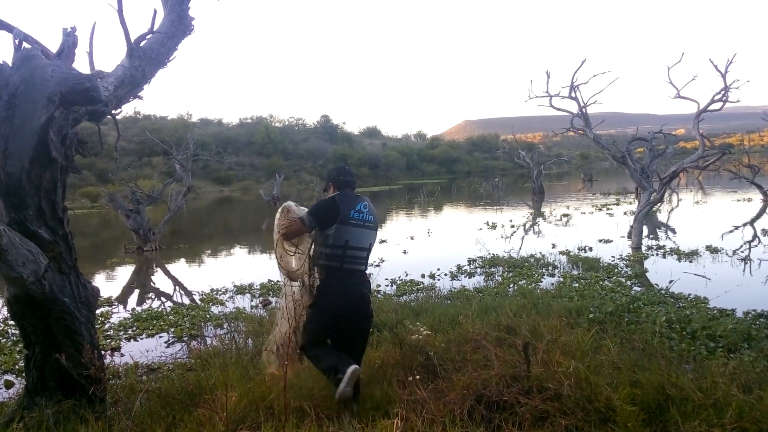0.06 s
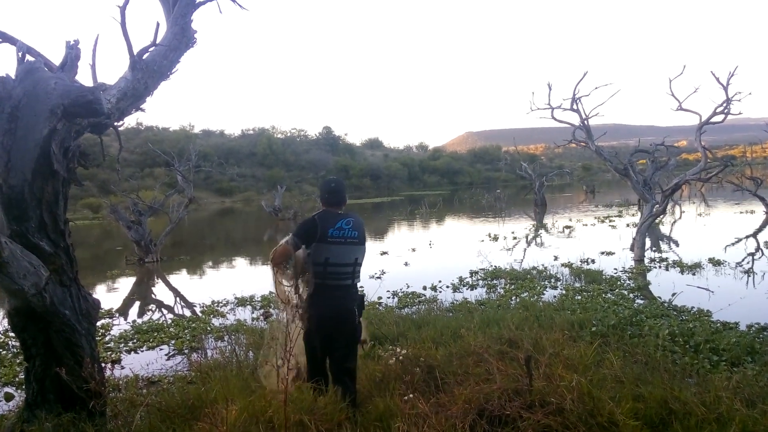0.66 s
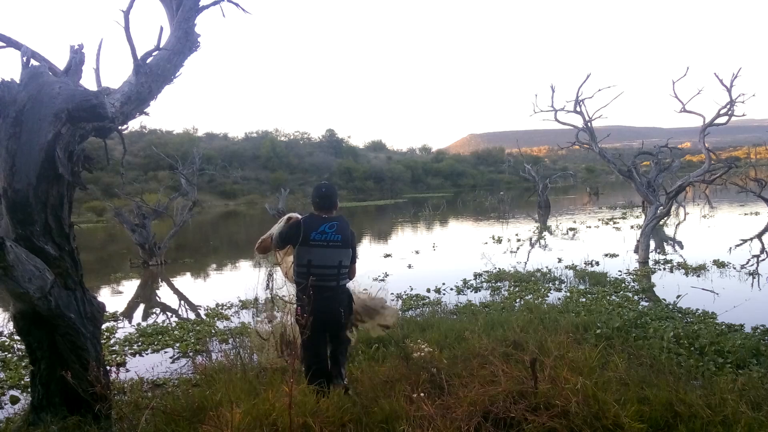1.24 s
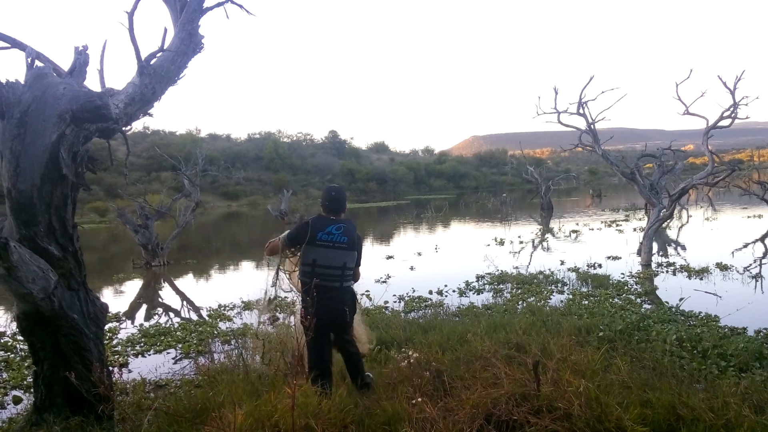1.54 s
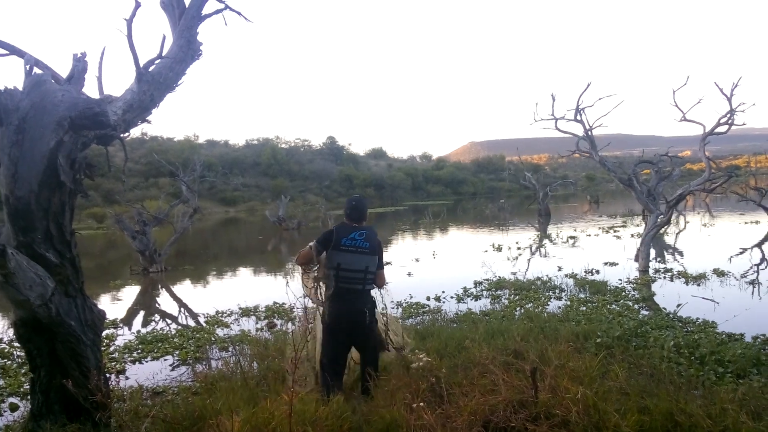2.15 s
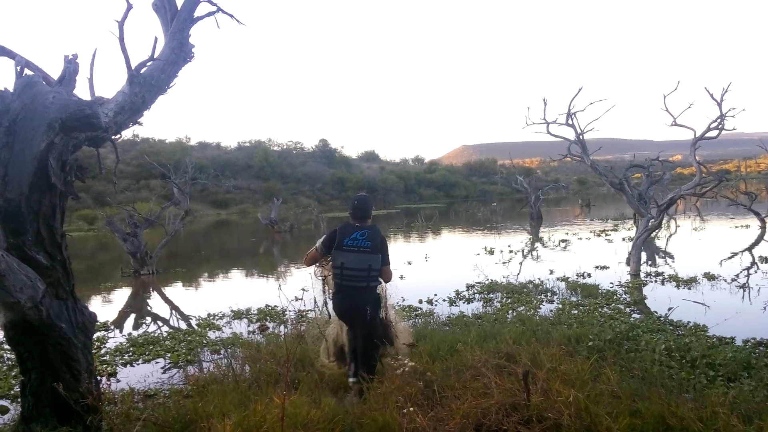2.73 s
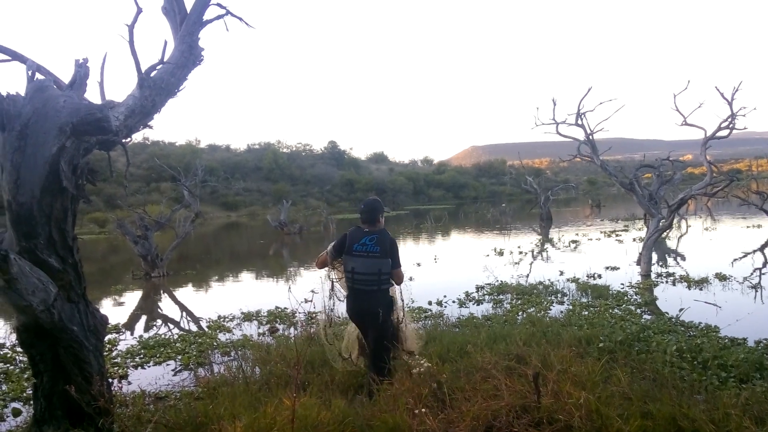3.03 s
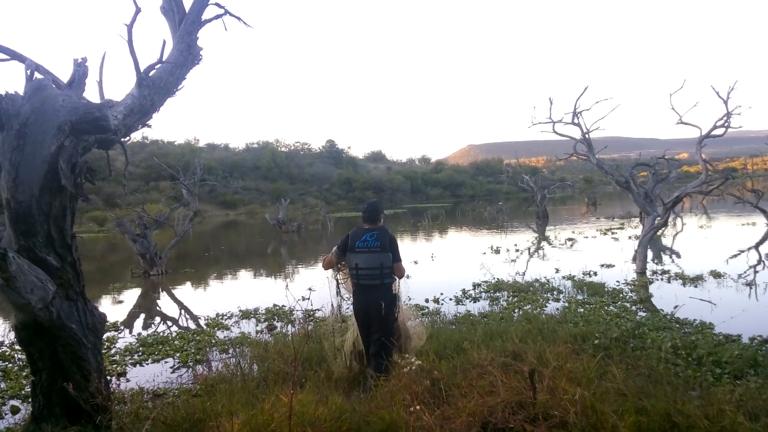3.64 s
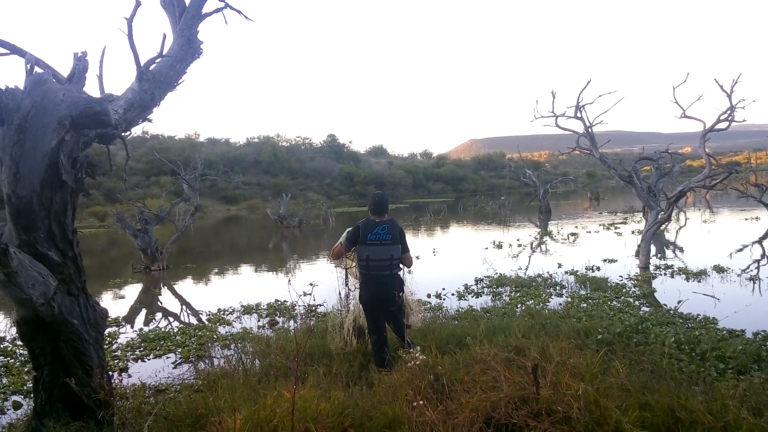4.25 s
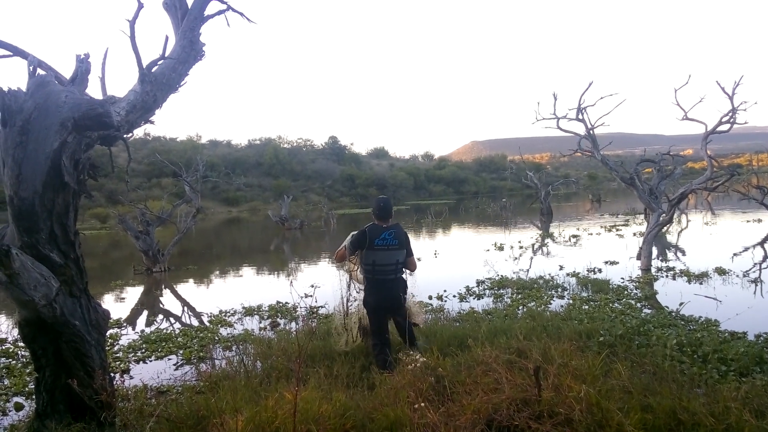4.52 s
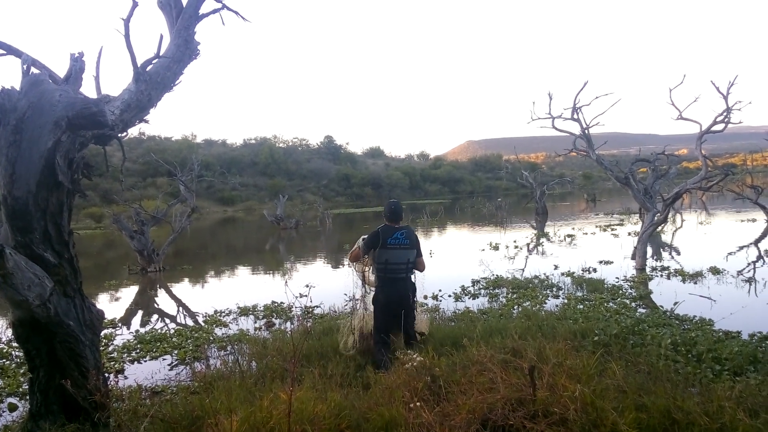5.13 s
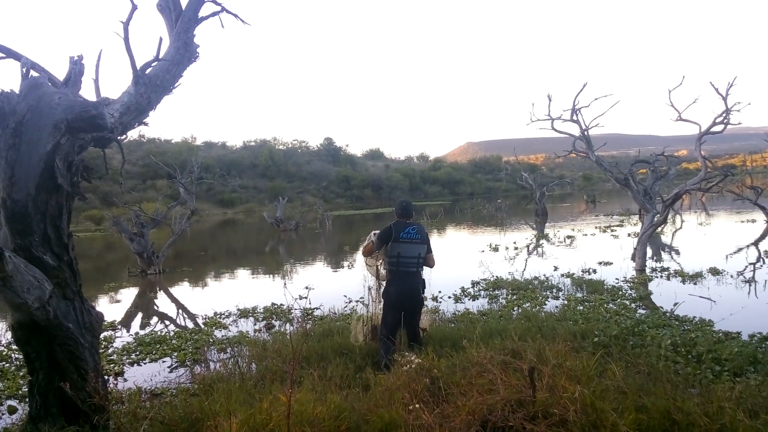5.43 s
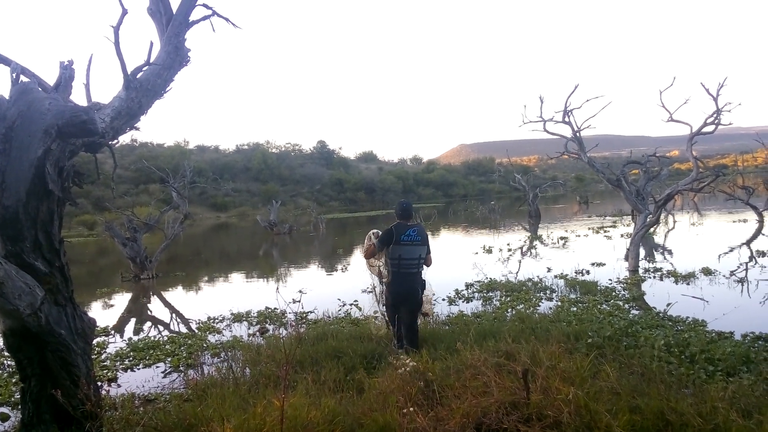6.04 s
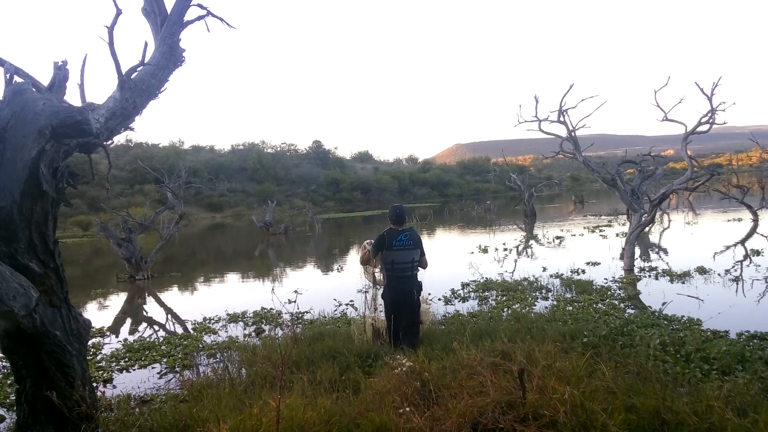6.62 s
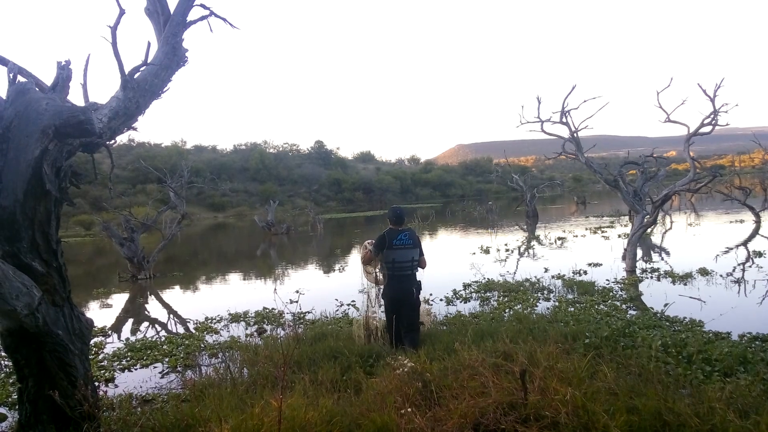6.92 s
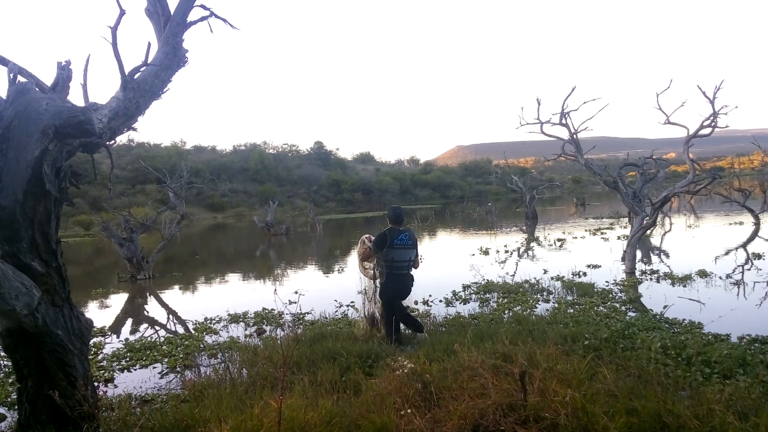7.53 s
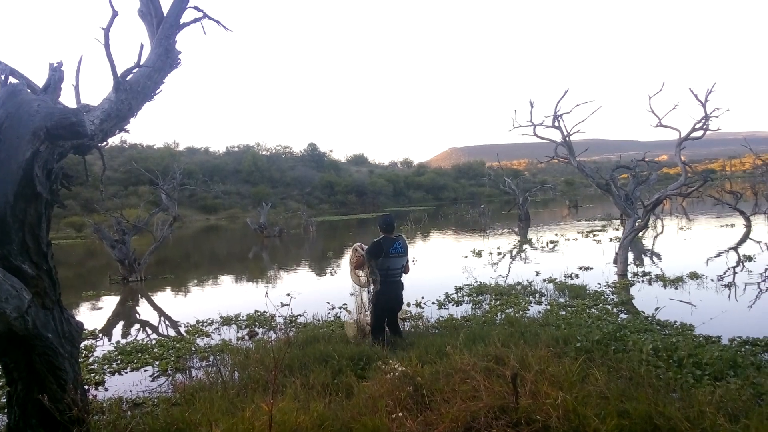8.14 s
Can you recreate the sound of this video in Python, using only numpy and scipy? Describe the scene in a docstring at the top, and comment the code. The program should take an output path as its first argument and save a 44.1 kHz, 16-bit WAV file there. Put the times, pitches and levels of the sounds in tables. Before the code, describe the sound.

A person wades through a grassy lake shallows, moving away from the microphone. From the start, grass hisses and a carried net fizzes softly, with sharp stalk snaps around 0.6 seconds. Uneven steps slosh and bubble, clearest at about 1.2 to 1.7, 2.5, 4.1, 5.7, 6.3 and 7.4 seconds, with small plops and gurgles, the strongest plop near 1.3. Each step brings swishing blades and crackling stems, continuing until the end just after 8 seconds. A nearby cricket chirps rapidly and high throughout; a second trills from 0.8 to 1.5 seconds. A small bird gives sharp, high chips at about 0.8, 2, 3, 4.3 and 5.6 seconds. Faint, short waterbird hoots come from far off near 0.9 and 2 seconds. Behind everything are a soft hush of open air and a distant insect chorus that swells around 1 second, with a tiny high buzz near 7.

```python
"""At the marshy edge of a lake, a fisherman carrying a cast net wades away from the microphone.
Each step sloshes and gulps as bubbles ring in the shallow water; then his legs and the net drag
through the grass, hissing and snapping stalks. Close by, a cricket scrapes its wings in chirps and
a second trills briefly. A small bird whistles sharp chips; far off, a waterbird hoots and an insect
chorus swells and ebbs in the open air."""
import sys
import numpy as np
from scipy import signal
from scipy.fft import rfft, irfft, next_fast_len
from scipy.io import wavfile
from scipy.ndimage import map_coordinates

SR = 44100
rng = np.random.default_rng(int(sys.argv[2]) if len(sys.argv) > 2 else 0)


def store_pcm(level_fs):
    """Save levels as 16-bit WAV."""
    pcm = np.round(np.clip(level_fs, -1, 1) * 32767).astype(np.int16)
    wavfile.write(sys.argv[1], SR, np.atleast_2d(pcm).T)


N = 369116
TIME = np.arange(N) / SR

# Small and large bubbles in the shallows. Each row: frequency in Hz, relative level in dB.
SMALL_BUBBLE_SPECTRUM = [(480, -39), (680, -4.5), (1100, 0), (1600, 0), (2300, -5), (3500, -15)]
LARGE_BUBBLE_SPECTRUM = [(110, -19), (250, -19), (380, 2.5), (500, -2.5), (720, -3), (950, -5), (1400, -47)]
# A foot plunges in or pulls out. Each row: start, rise and hold in seconds, levels of the small
# and the large bubbles in dB.
FOOT_SLOSHES = [(.09, 0.028, .2, -59.5, -85), (.275, 0.079, .015, -68, -60.5),
                (.49, 0.082, 0.15, -58.5, -58.5), (1.177, 0.076, .216, -49, -53),
                (1.52, 0.085, .015, -51, -57.5), (1.73, .04, 0.16, -63.5, -81),
                (2.52, 0.032, 0.24, -49.5, -55.5), (2.86, 0.035, 0.061, -60.5, -66),
                (3.217, 0.08, .01, -60, -70.5), (4.047, 0.13, 0.065, -48.5, -59),
                (4.313, .06, .097, -63.5, -74.5), (4.716, 0.072, .01, -66, -77),
                (5.69, 0.12, 0.047, -48, -70), (6.01, 0.031, 0.21, -64.5, -87),
                (6.268, 0.029, 0.013, -52.5, -65), (6.477, 0.017, 0.015, -59, -63),
                (6.66, .08, .04, -67, -77), (7.355, 0.023, 0.084, -50, -56),
                (7.481, 0.015, 0.22, -54.5, -65.5), (7.846, 0.049, .065, -58.5, -68),
                (8.027, 0.026, 0.1, -62, -68.5), (8.19, .04, 0.039, -66.5, -85.5)]


def wading(small_db=-1.5):
    """Each step churns up clouds of bubbles; the deeper the foot sinks, the more large ones."""
    # The water calms slowly while the foot moves, quickly once it stops.
    small, large = movement_gains(FOOT_SLOSHES, sag_db_per_s=7.5, t60=.36)
    small *= grains(SMALL_BUBBLE_SPECTRUM, per_s=900, cycles=30, spread_db=3, clump_db=6,
                    glide=.14, wash=.15)
    large *= grains(LARGE_BUBBLE_SPECTRUM, per_s=520, cycles=24, spread_db=2.4, clump_db=4,
                    glide=.14, wash=.2)
    return amp(small_db) * small + large


# Air pockets close under the boots. Each row: start in seconds, level in dB, starting pitch in Hz,
# seconds to fade by 60 dB.
AIR_POCKETS = [(0.09, -36.5, 2940, 0.023), (0.186, -44, 1950, 0.046), (0.595, -38, 460, 0.02),
               (0.681, -47, 1210, 0.085), (1.2594, -24.5, 1100, 0.018), (1.262, -29.5, 756, 0.025),
               (1.278, -30.5, 645, 0.024), (1.389, -42, 353, 0.082), (1.478, -39, 1042, 0.033),
               (1.625, -42, 417, 0.074), (2.245, -53.5, 476, 0.047), (2.549, -39, 820, 0.065),
               (2.556, -39, 1180, 0.045), (2.559, -36.5, 2200, 0.021), (2.612, -41, 481, 0.11),
               (2.613, -33, 717, 0.092), (3.055, -52.5, 472, 0.038), (4.2, -43, 673, .05),
               (4.35, -36.5, 3500, .018), (5.735, -44.5, 1064, 0.052), (5.793, -39, 994, 0.026),
               (6.049, -48, 1085, 0.051), (7.376, -33, 2860, 0.018), (7.378, -41.5, 820, .04),
               (7.395, -44.5, 430, 0.092), (7.515, -39, 720, 0.04), (7.83, -40, 2250, 0.026)]


def plops(gain_db=1):
    """Single bubbles ring out, rising in pitch as they near the surface."""
    out = np.zeros(N)
    for start, db, hz, t60 in AIR_POCKETS:
        add(out, start, amp(db + gain_db) * ring(hz, t60, glide=.09))
    return out


# Water rushes into and out of a footprint. Each row: start and length in seconds, level in dB,
# first and last pitch in Hz.
FOOTPRINT_GURGLES = [(1.322, 0.095, -50, 779, 902), (2.618, 0.11, -56.5, 623, 415),
                     (6.618, 0.32, -71.5, 920, 1144), (7.387, 0.085, -52.5, 720, 1150),
                     (7.89, 0.13, -68, 558, 466), (8.054, 0.075, -63.5, 558, 615)]


def gurgles(gain_db=.5, width_hz=200):
    """The churning water sounds a cavity whose pitch moves as it fills or opens."""
    out = np.zeros(N)
    for start, length, db, first_hz, last_hz in FOOTPRINT_GURGLES:
        progress = np.linspace(0, 1, int(length * SR))
        churn = rng.standard_normal(len(progress)) + 1j * rng.standard_normal(len(progress))
        churn = signal.sosfilt(signal.butter(2, width_hz / 2, fs=SR, output="sos"), churn)
        pitch = first_hz * (last_hz / first_hz) ** progress
        cavity = (churn * np.exp(2j * np.pi * np.cumsum(pitch) / SR)).real
        add(out, start, amp(db) * unit(cavity * np.sqrt(progress) * (1 - progress)))
    return out


# Fine blades and coarse stalks. Each row: frequency in Hz, relative level in dB.
BLADE_SPECTRUM = [(3000, -39), (4400, -11.5), (5600, -5.5), (6600, 3.5), (7600, -1.5), (8600, -8),
                  (9700, -12), (11000, -21.5), (13000, -30), (16000, -51)]
STALK_SPECTRUM = [(1300, -7.5), (2200, -0.5), (3100, -0.5), (4300, -0.5), (6000, 2.5), (9000, -45)]
# A leg or the net sweeps through the grass. Each row: start, rise and hold in seconds, levels of
# the blades and the stalks in dB.
GRASS_SWEEPS = [(.065, .023, 0.024, -54, -51.5), (.089, 0.12, 0.13, -53, -59.5),
                (.514, 0.1, 0.036, -49, -53.5), (1.25, 0.13, 0.18, -55.5, -53),
                (1.503, .12, 0.14, -50.5, -62), (1.759, 0.056, 0.084, -59, -56.5),
                (2.515, 0.013, 0.036, -62.5, -59), (2.6, 0.047, 0.18, -56.5, -55),
                (2.812, 0.05, 0.2, -60, -59), (3.17, 0.088, 0.066, -59.5, -64.5),
                (4.03, 0.067, 0.24, -62.5, -58), (4.274, 0.14, 0.04, -53, -53.5),
                (4.48, 0.064, 0.076, -57, -77), (4.68, 0.11, 0.01, -58.5, -56),
                (5.65, 0.11, 0.11, -64, -58), (5.987, 0.095, .18, -63, -62.5),
                (6.249, 0.054, 0.067, -59, -57), (6.464, 0.027, .037, -66.5, -64),
                (7.345, 0.037, 0.22, -64, -59.5), (7.59, 0.052, .114, -55, -54.5),
                (7.76, .06, .1, -56.5, -54.5), (8.16, 0.05, 0.075, -72, -65.5)]
# The hanging net trails behind, fainter with distance. Each row: time in seconds, level in dB.
NET_TRAIL = [(0, -57), (.45, -60), (1, -60.5), (2.2, -65.5), (3.1, -68), (3.7, -75), (4.1, -75.5),
             (4.9, -70), (5.5, -76), (6.6, -72), (7.2, -80.5), (8, -68), (8.37, -76)]


def grass(blades_db=5.5, stalks_db=2, cracks_db=-5, trail_stalks_db=-13, catch_db=1.72):
    """Blades hiss, stalks crackle and the net's mesh fizzes as they catch and slip."""
    # The drag grows as the leg pushes on; then the blades spring back and settle.
    fine, coarse = movement_gains(GRASS_SWEEPS, sag_db_per_s=-1.5, t60=.42)
    trail = amp(level_at(TIME, NET_TRAIL))
    fine = np.hypot(fine, trail)
    coarse = np.hypot(coarse, amp(trail_stalks_db) * trail)
    hiss = grains(BLADE_SPECTRUM, per_s=3500, cycles=14.4, spread_db=4, clump_db=3.5, wash=.7)
    crackle = grains(STALK_SPECTRUM, per_s=1200, cycles=39, spread_db=3, clump_db=4.5, wash=.62)
    cracks = grains(STALK_SPECTRUM, per_s=45, cycles=13, spread_db=3, clump_db=3, pitches=8)
    blades = fine * amp(blades_db) * hiss
    stalks = coarse * (amp(stalks_db) * crackle + amp(cracks_db) * cracks)
    return (blades + stalks + net_mesh()) * amp(catch_db * drift(70))


# The fizz of the net. Each row: frequency in Hz, relative level in dB.
MESH_SPECTRUM = [(6500, -17.5), (9000, 5), (10700, -1.5), (12500, -7.5), (14000, -21), (16000, -8)]
# The net shifts as he carries it. Each row: start, rise and hold in seconds, level in dB.
MESH_SLIDES = [(.08, .12, .505, -55.5), (1.107, 0.33, .08, -65), (1.6, .07, 0.037, -50.5),
               (6.277, .048, .046, -71), (7.54, 0.16, .236, -65)]


def net_mesh(gain_db=3):
    """Wet mesh slides over itself with a high fizz."""
    slide = movement_gains(MESH_SLIDES, sag_db_per_s=17, t60=.33)[0]
    return amp(gain_db) * slide * noise(MESH_SPECTRUM)


# Stalks snap and whip against the net. Each row: start in seconds, level in dB, the stem's level
# offset in dB, seconds to fade by 60 dB.
STALK_SNAPS = [(.057, -31, -21, 0.0074), (0.5108, -26, -27, 0.0055), (0.577, -13.5, -27, 0.0066),
               (0.613, -27.5, -10, 0.083), (0.62, -23, -7, 0.06), (1.504, -25, -13, 0.041),
               (1.648, -24.5, -12, 0.016), (1.79, -21, -19, .005), (2.522, -22.5, -25, 0.0049),
               (2.651, -24, -29, 0.014), (2.696, -24.5, -23, 0.01), (3.338, -30.5, -2.5, 0.0076),
               (4.241, -31, -2, 0.011), (4.35, -34, 6.5, 0.012), (4.463, -23, -7, 0.0059),
               (5.819, -41, -3, 0.0083), (6.212, -25, -25, 0.012), (6.241, -31.5, -24, 0.024),
               (7.532, -33, 1, 0.014), (7.843, -30, -10, 0.033), (7.905, -29, -22, 0.025),
               (8.031, -32.5, -21, 0.032)]
# A slight lift in a snap's high treble. Each row: frequency in Hz, gain in dB.
SNAP_TREBLE = [(9000, -0.5), (12000, 2.5), (16000, 0)]


def snaps(fibres_db=-3, body_db=-4, rise_s=.0002):
    """A breaking stalk gives a short burst, bright from the fibres and duller from the stem."""
    out, t = np.zeros(N), np.arange(6000) / SR
    for start, db, stem_db, t60 in STALK_SNAPS:
        fibres = amp(fibres_db) * np.tanh(noise(BLADE_SPECTRUM, len(t)))
        stem = amp(body_db + stem_db) * noise(STALK_SPECTRUM, len(t))
        envelope = (1 - np.exp(-t / rise_s)) * amp(-60 * t / t60)
        add(out, start, amp(db) * colour((fibres + stem) * envelope, SNAP_TREBLE))
    return out


def water_reflection(x, delay_s, share):
    """Adds a copy off the water, whose extra path to the microphone changes as the wader moves."""
    lag = delay_s * (1 + .1115 * drift(1.5))
    reflected = map_coordinates(x, [(TIME - lag) * SR], order=3)
    return (x + share * reflected) / np.sqrt(1 + share ** 2)


# The cricket near the microphone. Each row: time in seconds, level in dB.
CRICKET_LEVELS = [(0, -45.5), (1, -47.5), (2.3, -46.5), (3, -44), (4, -45), (5.6, -45.5), (6.6, -46.5),
                  (7.2, -47.5), (7.9, -47.5), (8.37, -44.5)]
# It chirps evenly in runs. Each entry: the time in seconds at which a run's first chirp ends.
CHIRP_RUNS = [-.027, .226, .48, .735, 1.166, 1.418, 1.762, 1.926, 2.001, 2.165, 2.6, 2.852, 4.347, 4.601,
              5.476, 5.729, 6.161, 6.33, 6.583, 7.106, 7.449, 7.791, 8.131, 8.473]


def near_cricket(hz=4880, beat_s=.0148, stroke_s=.0102, jitter_s=.0002, gain_db=.3, fade_db=.5):
    """Each chirp swells over four or five wing strokes, then rests for one beat."""
    out, ends, chirp_s = np.zeros(N), [], 6 * beat_s
    for first, next_run in zip(CHIRP_RUNS, CHIRP_RUNS[1:]):
        last = next_run - (chirp_s - beat_s)  # the next run opens one stroke short
        ends.extend(np.linspace(first, last, round((last - first) / chirp_s) + 1))
    for end, gap in zip(ends[1:], np.diff(ends)):
        db = gain_db + level_at(end, CRICKET_LEVELS)
        for k in range(round(gap / beat_s) - 1):  # counted back from the last stroke
            stroke = wing_stroke(hz * (1 + .0016 * k), stroke_s, fall=.074)
            start = end - k * beat_s - stroke_s / 2 + jitter_s * rng.standard_normal()
            add(out, start, amp(db - fade_db * k ** 2) * stroke)
    return out


# A second cricket joins in briefly. Each row: time in seconds, level in dB.
TRILL_LEVELS = [(.78, -60), (.94, -46.5), (1.2, -45), (1.4, -47), (1.48, -62)]


def trilling_cricket(hz=5330, beat_s=.0139, stroke_s=.0102, jitter_s=.0005):
    """Wing strokes follow without a rest and make an even trill."""
    out = np.zeros(N)
    for start in np.arange(TRILL_LEVELS[0][0], TRILL_LEVELS[-1][0], beat_s):
        stroke = amp(level_at(start, TRILL_LEVELS)) * wing_stroke(hz, stroke_s, fall=.048)
        add(out, start + jitter_s * rng.standard_normal(), stroke)
    return out


def wing_stroke(hz, length_s, fall):
    """The scraper runs along the file and slows: a short tone that sags in pitch."""
    position = np.linspace(-1, 1, int(length_s * SR))
    pitch = hz * (1 + .0061 * rng.standard_normal()) * (1 - fall * position)
    force = amp(.7 * rng.standard_normal())
    return force * np.cos(np.pi * position / 2) ** 2 * np.sin(2 * np.pi * np.cumsum(pitch) / SR)


# A small bird calls. Each row: start in seconds, level in dB, lowest pitch in Hz.
BIRD_CHIPS = [(0.827, -32.5, 6370), (1.958, -37.5, 6080), (3.011, -31.5, 6320), (4.301, -33, 6410),
              (5.571, -37.5, 6380)]
# One chip dives and hooks back up. Each row: seconds into it, pitch factor, relative level in dB.
CHIP_SHAPE = [(0, 1.36, -26), (.003, 1.15, -9), (.008, 1.02, 0), (.013, 1, -1), (.016, 1.11, -7),
              (.021, 1.07, -24)]


def small_bird(echo_db=-5):
    """Sharp whistled chips echo in the brush."""
    out = np.zeros(N)
    times, factor, shape_db = np.transpose(CHIP_SHAPE)
    t = np.arange(0, times[-1], 1 / SR)
    for start, db, hz in BIRD_CHIPS:
        turns = np.cumsum(hz * np.interp(t, times, factor)) / SR
        add(out, start, amp(db + np.interp(t, times, shape_db)) * np.sin(2 * np.pi * turns))
    return out + amp(echo_db) * scatter(out, t60=.28, delay_s=.005)


# Soft notes far from the microphone. Each row: start in seconds, level in dB, pitch in Hz.
FAR_HOOTS = [(.845, -60, 874), (.925, -62.5, 940), (1.917, -52.5, 827), (2.016, -63.5, 796),
             (2.1, -69, 818), (2.31, -62.5, 812)]


def waterbird(length_s=.031, echo_db=-5):
    """Short rounded hoots come across the lake with their echo."""
    out, t = np.zeros(N), np.arange(0, length_s, 1 / SR)
    for start, db, hz in FAR_HOOTS:
        add(out, start, amp(db) * np.hanning(len(t)) * np.sin(2 * np.pi * hz * t))
    return out + amp(echo_db) * scatter(out, t60=.6, delay_s=.0184)


# Insects far out in the marsh. Each row: centre and width in Hz, level in dB.
CHORUS_BANDS = [(4880, 510, -63), (5333, 370, -64.5), (6865, 340, -68.5)]
# They swell and ebb together. Each row: time in seconds, gain in dB.
CHORUS_SWELL = [(0, -4), (1.1, 4), (2.2, -2.5), (3.7, -4), (5.3, -2), (7.2, -4.5), (8.37, -2.5)]


def insect_chorus(flutter_db=3):
    """Many distant voices blur into fluttering bands of noise."""
    voices = sum(amp(db + flutter_db * drift(120)) * band(hz, width) for hz, width, db in CHORUS_BANDS)
    return voices * amp(level_at(TIME, CHORUS_SWELL))


# One faint insect. Each row: time in seconds, level in dB.
BUZZ_LEVELS = [(6.88, -90), (6.94, -71), (7.03, -66.5), (7.08, -85)]


def insect_buzz(flutter_db=3):
    """A brief, high buzz flickers in two overlapping bands."""
    buzz = unit(band(hz=9200, width_hz=900) + band(hz=9900, width_hz=940))
    return buzz * amp(flutter_db * drift(150) + level_at(TIME, BUZZ_LEVELS, outside_db=-120))


# The air over the marsh. Each row: frequency in Hz, relative level in dB.
AIR_SPECTRUM = [(20, -17), (45, -7.5), (90, 0), (140, 3.5), (300, 2.5), (600, 2), (1200, -0.5),
                (2500, -3.5), (4000, -5), (7500, -11), (10000, -6.5), (13000, -7), (16000, -10.5)]


def open_air(level_db=-68):
    """Still air lays a steady hush under everything."""
    return amp(level_db) * noise(AIR_SPECTRUM)


def movement_gains(rows, sag_db_per_s, t60):
    """One gain curve per level column: each movement builds up, holds while it sags, and dies away."""
    power, t = np.zeros((len(rows[0]) - 3, N)), np.arange(SR) / SR
    for start, rise, hold, *levels in rows:
        sag_db = sag_db_per_s * np.maximum(t - rise, 0)
        release_db = 60 * np.maximum(t - rise - hold, 0) / t60
        shape = np.minimum(t / rise, 1) ** 2 * amp(-sag_db - release_db)
        for layer, db in zip(power, levels):
            add(layer, start, (amp(db) * shape) ** 2)
    return np.sqrt(power)


def grains(spectrum, per_s, cycles, spread_db, clump_db, glide=0, wash=0, pitches=32):
    """A shower of tiny rings of random size over a wash of those too small to tell apart."""
    out = np.zeros(N)
    for hz in np.geomspace(spectrum[0][0], spectrum[-1][0], pitches):
        gap, size = rng.exponential(1, (3000, 2)).T
        times = np.cumsum(gap) * pitches / per_s
        clump = np.interp(times * 30, np.arange(300), rng.uniform(-1, 1, 300))  # like sizes cluster
        heights = amp(spread_db * np.minimum(size, 3) + clump_db * clump)
        heights *= rng.choice([-1, 1], len(times))
        at = (times * SR).astype(int)
        clicks = np.bincount(at[at < N], heights[at < N], N)
        out += np.sqrt(hz) * unit(signal.oaconvolve(clicks, ring(hz, cycles / hz, glide))[:N])
    return unit(unit(colour(out, spectrum)) + wash * noise(spectrum))


def ring(hz, t60, glide):
    """A dying tone; a positive glide bends its pitch upward."""
    t = np.arange(int(t60 * SR) + 8) / SR
    onset = 1 - np.exp(-4 * hz * t)
    return onset * amp(-60 * t / t60) * np.sin(2 * np.pi * hz * t * (1 + glide * t / t60))


def scatter(x, t60, delay_s):
    """Reeds, trunks and water throw back a thin diffuse tail."""
    t = np.arange(SR // 2) / SR
    taps = rng.standard_normal(len(t)) * (rng.random(len(t)) < .1)
    taps *= (t > delay_s) * amp(-60 * t / t60)
    return signal.oaconvolve(x, taps / np.linalg.norm(taps))[:N]


def band(hz, width_hz):
    """Noise of rms 1 around one pitch."""
    size = next_fast_len(N)
    f = np.fft.rfftfreq(size, 1 / SR)
    rolloff = (1 + (2 * (f - hz) / width_hz) ** 4) ** 1.16
    return unit(irfft(rfft(rng.standard_normal(size)) / rolloff, size)[:N])


def noise(spectrum, samples=N):
    """Coloured noise of rms 1."""
    return unit(colour(rng.standard_normal(samples), spectrum))


def colour(x, spectrum):
    """Filters by a (Hz, dB) outline."""
    hz, db = np.transpose(spectrum)
    size = next_fast_len(len(x) + 512)
    f = np.fft.rfftfreq(size, 1 / SR)
    gain = amp(np.interp(np.log(f + 1), np.log(hz), db))
    return irfft(rfft(x, size) * gain, size)[:len(x)]


def drift(per_s):
    """A random wander of rms 1 that turns per_s times a second."""
    knots = rng.standard_normal(4096)
    return unit(np.interp(TIME * per_s, np.arange(len(knots)), knots))


def level_at(t, outline, outside_db=None):
    """Reads a (seconds, dB) outline at time t."""
    return np.interp(t, *np.transpose(outline), left=outside_db, right=outside_db)


def add(mix, start_s, sound):
    """Mixes a sound in at start_s."""
    start = int(round(start_s * SR))
    part = mix[max(start, 0):][:max(len(sound) + min(start, 0), 0)]
    part += sound[max(-start, 0):][:len(part)]


def amp(db):
    """Decibels to gain."""
    return 10 ** (np.asarray(db) / 20)


def unit(x):
    """Scales to rms 1."""
    return x / np.sqrt(np.mean(x ** 2) + 1e-20)


# The microphone's low cut and the thin bass of small splashes. Each row: frequency in Hz, gain in dB.
WADER_LOW_CUT = [(40, -21), (110, -7.5), (220, -2), (330, -5.5), (1000, 0)]


def scene():
    """One microphone in the open marsh hears the wader among insects and birds."""
    wader = colour(wading() + plops() + gurgles() + grass() + snaps(), WADER_LOW_CUT)
    wader = water_reflection(wader, delay_s=.0019, share=.28)
    wader += amp(-12) * scatter(wader, t60=.12, delay_s=.0093)
    crickets = near_cricket() + trilling_cricket()
    crickets += amp(-23) * scatter(crickets, t60=.23, delay_s=.0053)
    birds = small_bird() + waterbird()
    background = open_air() + insect_chorus() + insect_buzz()
    return (wader + crickets + birds + background)[None]


def record(dry):
    """The recorder's band limit cuts the highest treble."""
    lowpass = signal.firwin(511, cutoff=15800, window=("kaiser", 9), fs=SR)
    return signal.oaconvolve(dry, lowpass[None], "same")


dry = scene()
out = record(dry)
store_pcm(out)
```